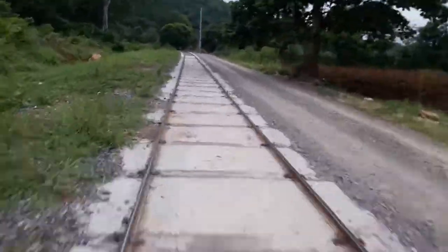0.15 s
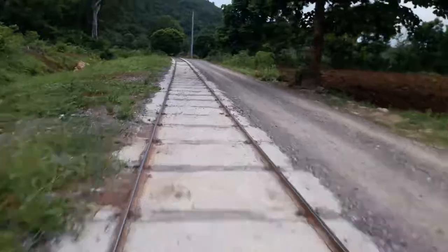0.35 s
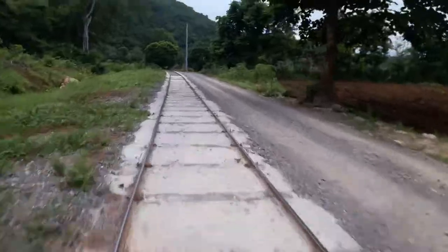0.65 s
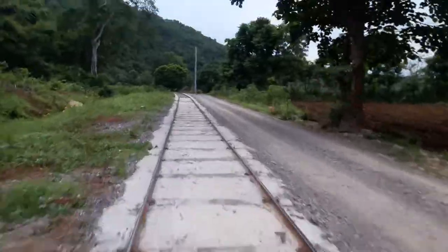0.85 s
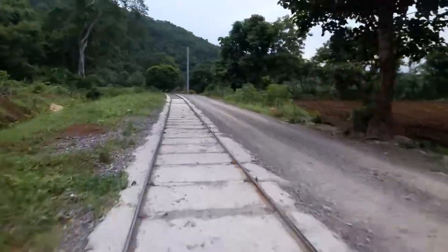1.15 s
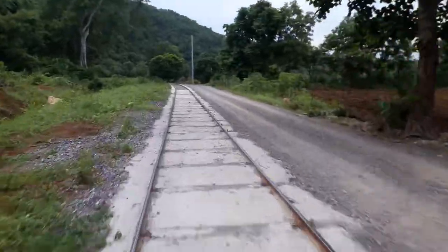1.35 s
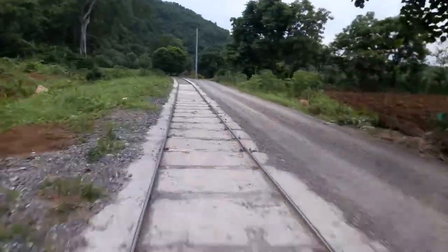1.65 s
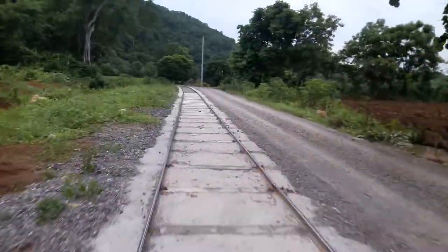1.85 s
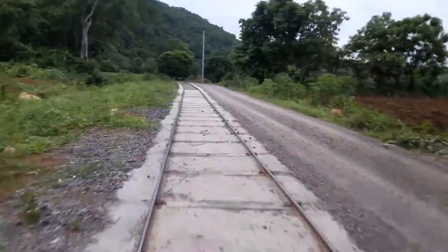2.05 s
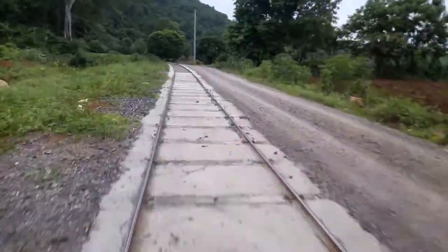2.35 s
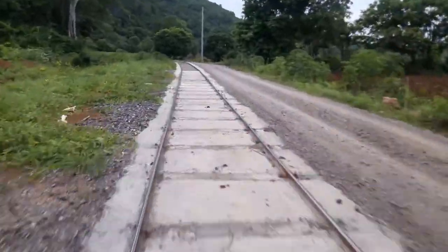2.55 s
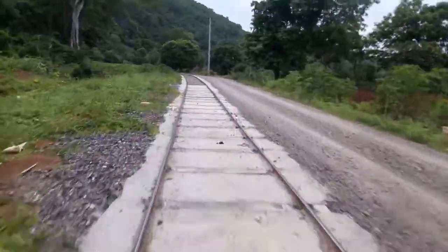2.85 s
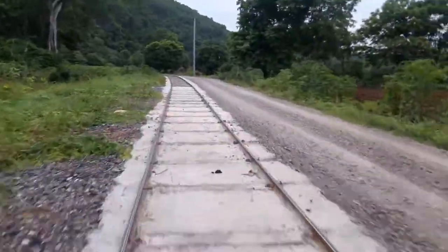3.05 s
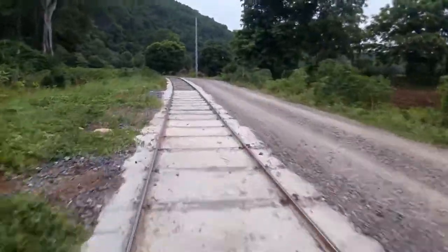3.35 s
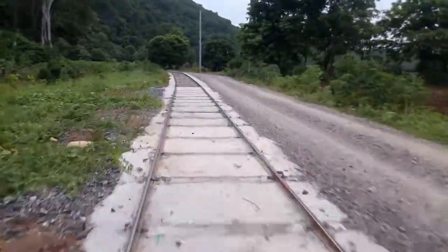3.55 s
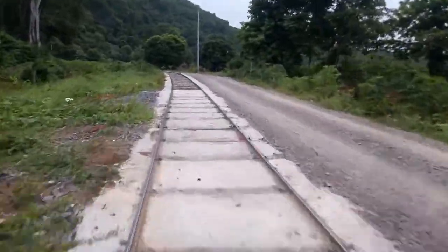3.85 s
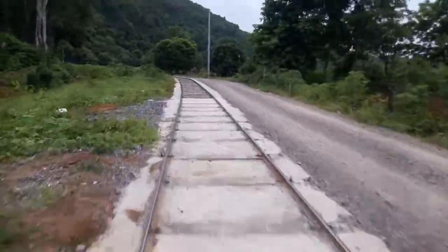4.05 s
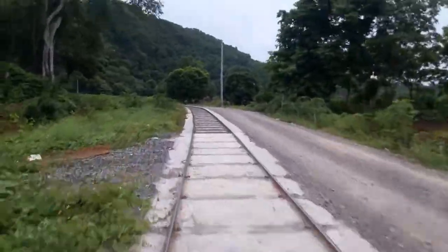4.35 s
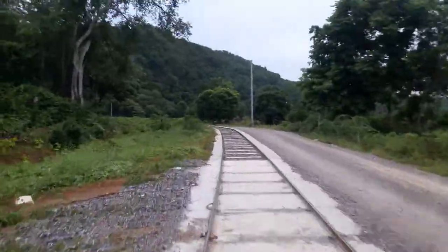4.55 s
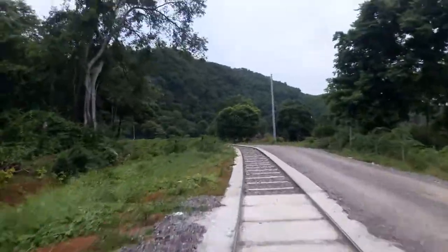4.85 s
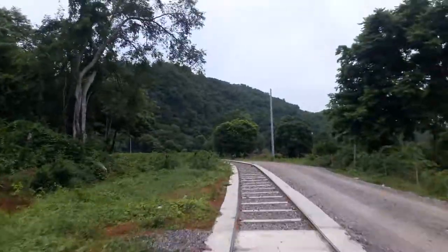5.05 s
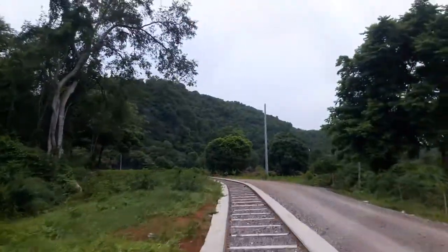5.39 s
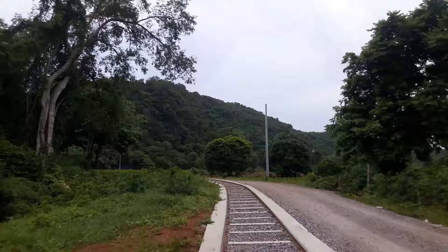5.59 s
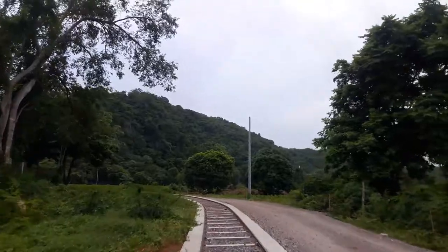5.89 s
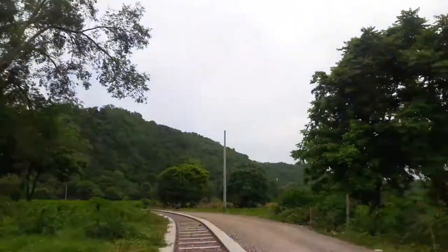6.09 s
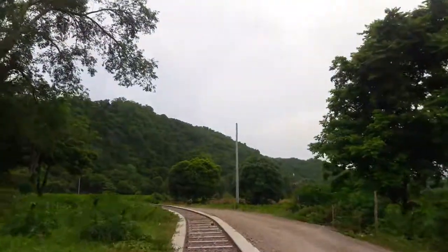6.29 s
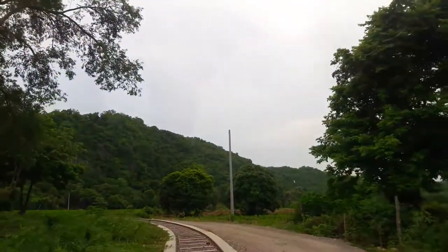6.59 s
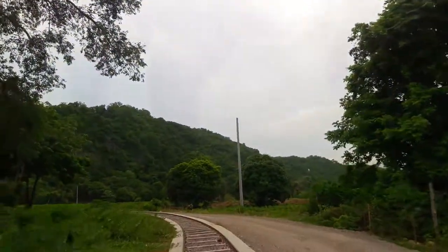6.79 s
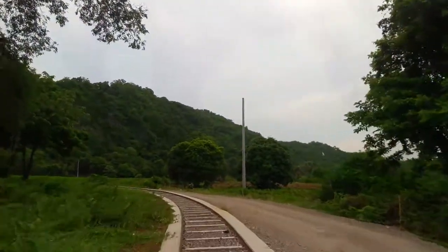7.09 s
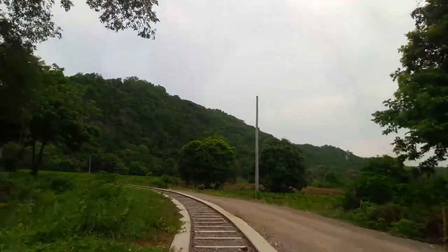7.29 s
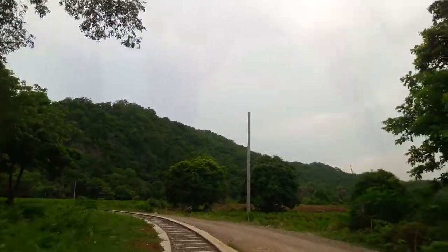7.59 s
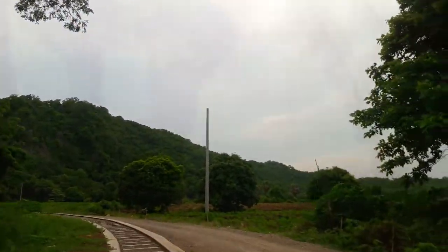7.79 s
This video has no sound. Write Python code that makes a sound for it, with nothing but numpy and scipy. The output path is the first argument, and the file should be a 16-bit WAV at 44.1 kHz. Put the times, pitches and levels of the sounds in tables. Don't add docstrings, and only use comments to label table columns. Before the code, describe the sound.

Low, dull rolling rumble of a rail cart with quick wheel thumps, metallic clacks and ticks, easing briefly, then booming harder over uneven rails.

```python
import sys
import numpy as np
from scipy import signal
from scipy.fft import rfft, irfft, next_fast_len
from scipy.io import wavfile
from scipy.ndimage import uniform_filter1d, minimum_filter1d, map_coordinates

SR = 44100
rng = np.random.default_rng(int(sys.argv[2]) if len(sys.argv) > 2 else 0)


def invert_db(level):
    return 10 ** (np.asarray(level, dtype=float) / 20)


def generate_wav(signal):
    frames = np.transpose(np.atleast_2d(signal))
    scaled = np.clip(frames, -1, 1) * 32767
    pcm = np.round(scaled).astype(np.int16)
    wavfile.write(sys.argv[1], SR, pcm)


N = 349713

# time in seconds, shake of the deck in dB,
# grind of wheel on rail in dB.
TRACK = [(0.0, -20.5, -42), (0.53, -24.5, -40), (0.77, -25.5, -40), (1.21, -21.5, -46),
         (1.54, -27.5, -46.5), (1.83, -24, -44), (2.12, -27, -47), (2.87, -27, -43.5), (3.22, -26.5, -45),
         (3.84, -25, -47), (4.77, -22.5, -40), (5.08, -20.5, -41), (5.72, -19, -45.5), (6.18, -17.5, -51),
         (6.49, -16, -44.5), (6.89, -18.5, -48), (7.57, -20, -49.5), (7.93, -19.5, -47)]
# time in seconds, level in dB, pitch in Hz.
HARD_LANDINGS = [(0.11, -18, 445), (0.35, -21, 355), (0.498, -20, 273), (0.75, -20.5, 298),
                 (0.984, -23.5, 454), (1.27, -23, 236), (1.648, -22, 485), (2.043, -24, 521.6),
                 (3.178, -22, 333), (3.31, -23.5, 498), (3.439, -19.5, 281), (3.445, -24, 499),
                 (3.57, -25, 355), (3.671, -20, 386), (3.803, -19.5, 474), (4.077, -25, 421),
                 (4.323, -19.5, 319), (4.724, -18, 427.6), (5.087, -17, 431), (5.472, -17.5, 443),
                 (5.73, -14, 218), (5.877, -18.5, 481), (6.525, -19.5, 464), (6.755, -17, 284),
                 (7.281, -13, 234.6), (7.568, -13, 246.3), (7.708, -15, 226), (7.819, -17.5, 322)]
# time in
# seconds, level in dB, pitch in Hz.
THUDS = [(0.227, -19.5, 178.6), (0.478, -40, 161.6), (0.772, -20.5, 139), (1.123, -24.5, 209),
         (1.317, -26, 100.3), (1.778, -25.5, 164.5), (1.958, -29.5, 153), (2.547, -23.5, 115.7),
         (2.927, -29, 118), (3.434, -19.5, 161.7), (3.747, -26.5, 147.7), (4.165, -25, 94.3),
         (4.334, -19, 140.8), (4.554, -27, 135), (4.997, -17, 182.4), (5.229, -9.5, 129.5),
         (5.458, -14.5, 130), (5.73, -26, 215.7), (5.892, -18, 222.3), (6.13, -21.5, 151),
         (6.442, -11.5, 207.8), (6.93, -14.5, 203.6), (7.057, -11.5, 154.7), (7.837, -20, 201),
         (6.285, -10, 185.2), (6.32, -9.5, 199), (6.392, -9.5, 140), (6.535, -7.5, 195),
            (6.603, -11.5, 137.6), (6.66, -8.5, 186), (6.75, -14.5, 122.6), (5.56, -25, 191.5),
            (7.4, -20, 193), (7.5, -19, 189.4)]
# time in seconds, peak in dB, ring in Hz, bright edge in dB.
CLACKS = [(0.4319, -31.5, 921, -35), (0.6655, -30, 902, -34.5), (0.7444, -17.5, 1780, -35),
          (0.8203, -29.5, 1720, -40.5), (0.9743, -20.5, 939, -29), (1.2303, -33, 926, -41),
          (1.53, -32.5, 1300, -33), (1.6427, -21.5, 1030, -42), (1.813, -30, 1660, -45.5),
          (2.09, -29.5, 1350, -42), (3.4236, -22.5, 1670, -38), (3.6582, -28.5, 1450, -44),
          (3.789, -32.5, 1500, -38), (3.833, -24, 1630, -39), (3.882, -27, 2700, -37),
          (4.06, -35, 914, -42), (4.3195, -19, 1026, -38.5), (4.4907, -26.5, 1060, -44.5),
          (4.6367, -26, 902, -40), (4.994, -27, 1280, -40.5), (5.2112, -19, 1546, -30.5),
          (5.452, -27, 993, -35.5), (6.19, -32.5, 1500, -28), (6.2736, -30.5, 902, -35.5),
          (6.392, -24, 988, -31), (6.64, -28, 1800, -28), (6.7503, -28, 1010, -31),
          (7.1095, -36, 1330, -38.5), (7.273, -36, 930, -37.5)]
# start in seconds, end in seconds, level in dB.
BUZZ_SPELLS = [
    (.55, 0.598, -66),
    (4.6, 5.25, -79),
    (6.27, 6.66, -61),
    (6.76, 6.8, -70),
    (7.9, 7.93, -68),
]
# time in seconds, peak in dB, pitch in Hz.
TICKS = [(0.4589, -24, 1750), (3.4944, -29, 1770), (3.7344, -37, 2700), (3.7653, -41, 2700),
         (3.8033, -34, 2750), (3.8244, -35, 1650), (3.8544, -40, 1520), (3.8851, -30, 2830),
         (3.9145, -29, 1890), (3.9594, -42, 1570), (4.3694, -34, 2300), (4.4732, -35, 1600),
         (4.5494, -28, 1540), (4.6444, -32, 1520), (4.7594, -27, 1980), (4.81, -36, 1900),
         (4.9444, -31, 1950), (6.1094, -37, 2270), (6.1894, -29.5, 1490), (6.3131, -27.5, 1750),
         (6.4494, -36, 1840), (6.5146, -33, 1855), (6.6398, -26, 1793)]
# time in seconds, peak in dB, pitch in Hz.
TOCKS = [
    (2.966, -23, 910),
    (4.144, -18.5, 880),
    (7.095, -20.5, 1030),
]
# time in seconds, peak in dB.
PINGS = [(0.096, -50), (0.2059, -51), (0.9792, -49), (1.697, -54), (1.8114, -52), (3.1792, -63),
         (3.2296, -52), (3.3553, -55), (3.7294, -56), (3.9564, -51), (4.1999, -59), (4.361, -49),
         (4.5511, -51.5), (4.628, -60), (5.214, -53.5), (5.2535, -47), (5.7519, -58), (5.9923, -64),
         (6.0861, -61), (6.1275, -52.5), (6.1853, -58), (6.2372, -57), (6.2786, -56), (6.3609, -46),
         (6.4158, -42), (6.4383, -49), (6.5415, -39), (6.578, -47), (6.6124, -49), (6.7386, -60)]
# time in seconds, peak in dB.
SPITS = [(0.472, -54.5), (0.5499, -53.5), (0.59, -41.5), (1.5211, -59), (1.5327, -57.5), (2.641, -65.5),
         (3.176, -71.5), (3.7886, -54.5), (3.9005, -73), (4.1846, -50.5), (4.2094, -57.5), (4.329, -60),
         (4.4166, -50), (4.4437, -58.5), (4.4609, -63.5), (4.9565, -64.5), (5.0544, -65.5), (5.09, -48.5),
         (5.2097, -68)]
# time in seconds, pitch in Hz, level in dB.
INSECTS = [
    [(.2, 7450, -110), (.35, 7420, -96.5), (.7, 7380, -90), (.9, 7350, -110)],
    [(4.2, 6750, -110), (4.3, 6750, -90), (4.5, 6650, -90), (4.9, 6450, -86), (5.25, 6350, -83.5),
     (5.35, 6350, -110)],
]
# peak in seconds, rise in seconds, fall in seconds,
# scrape in dB, fizz in dB.
GRASS = [
    (.6, .12, 0.082, -70.5, -59),
    (4.9, .5, .25, -81.5, -85.5),
    (6.54, .15, .2, -67, -90),
]
# centre in Hz, width in Hz, level in dB.
DECK = [(70, 22, -6.5), (99.7, 22, -2.5), (140.8, 34, 0), (195, 71, -3.5)]
FRAME = [(287, 164, 2.5), (355, 35, -2), (455.5, 37, -1), (503, 150, -8)]
RAIL = [(625, 380, 0.17), (860, 260, 0.19), (1010, 92, -2.2)]
WHEEL = [(1381, 160, 4), (1750, 280, 1), (2285, 340, -7), (2860, 280, -3)]
FITTING = [(10230, 220, -5.5), (11500, 350, -0.5)]
BUZZ = [(3636, 260, 0)]
# frequency in Hz, level in dB.
KNOCK = [(200, -41), (600, 3), (1200, -1.5), (2800, -6), (3400, -25), (4500, -46.5), (16000, -75.5)]
SCRAPE = [(2500, -29), (3300, 0.5), (3900, -2), (4400, -3), (5000, -7.5), (6500, -15.5), (7500, -34.5),
          (9000, -61), (16000, -63)]
FIZZ = [(3000, -60), (9000, -39), (11000, -23.5), (12200, -5), (14000, -2), (15200, -2.5), (16000, -3)]
HISS = [(2000, -13.5), (6000, -8), (7000, -9), (8000, -15.5), (9000, -8.5), (12000, -3), (15700, -1.5)]
HOUSING = [(15, -13), (28, -4.5), (45, 0), (2700, -1), (3100, -8), (3500, -16.5), (5000, -24), (8000, -56),
           (16000, -59.5)]

FLAT_S, TURN_S, SLIP_S, FLAT_DB, FLAT_SCATTER_DB = .11, .128, .01, -4.5, 1.9
FRAME_LOW_HZ, FRAME_HIGH_HZ = 238, 428.5
BUZZ_REST_DB, BUZZ_RISE_S, BUZZ_FALL_S = -78.5, .04, 0.023
JINGLE_S, JINGLE_GAP_S, JINGLE_DB, JINGLE_RISE_S, JINGLE_FALL_S = 6.375, 0.093, -71.5, .022, .016
SCRAPE_DB, SCRAPE_GROWS, FIZZ_DB = -80.5, .8, -84.5
CLACK_T60_S = .085
ROUGH_S, ROUGH_END_S, ROUGH_DB = 6.28, 6.69, 1.5


def unit(x):
    return x / np.sqrt(np.mean(x ** 2) + 1e-20)


def curves(rows):
    s, *cols = np.transpose(rows)
    return [np.interp(np.arange(N) / SR, s, c) for c in cols]


def controls():
    return [(c.mean(), c - c.mean()) for c in curves(TRACK)]


def wobble(rate):
    knots = rng.standard_normal(int(N * rate / SR) + 4)
    return map_coordinates(knots, [np.arange(N) * rate / SR])


def spell(start, end, rise_s, fall_s):
    t = np.arange(N) / SR
    return np.exp(-np.maximum(start - t, 0) / rise_s - np.maximum(t - end, 0) / fall_s)


def strike(t, t60_s, attack_s):
    return invert_db(-60 * t / t60_s) * (1 - np.exp(-t / attack_s))


def add(track, s, sound):
    part = track[max(round(s * SR), 0):][:len(sound)]
    part += sound[:len(part)]


def filtered(x, response):
    m = next_fast_len(len(x) + 8192)
    return irfft(rfft(x, m) * response(np.fft.rfftfreq(m, 1 / SR)), m)[:len(x)]


def colour(points):
    f, db = np.transpose(points)
    return lambda hz: invert_db(np.interp(np.log(hz + 1), np.log(f), db))


def modes(table, fall):
    def response(f):
        power = 0
        for centre, width, db in table:
            peak = np.abs(f * width / (centre * centre - f * f + 1j * f * width))
            power = power + invert_db(2 * db) * peak ** (2 * fall)
        return np.sqrt(power)
    return response


def rush(response, patchy_db, grit_db):
    rough = rng.standard_normal(N) * invert_db(grit_db * wobble(120))
    z = signal.stft(rough, nperseg=1024)[2]
    field = uniform_filter1d(rng.standard_normal(z.shape), size=5, axis=0)
    field = uniform_filter1d(field, size=6, axis=1)
    patchy = signal.istft(z * invert_db(patchy_db * unit(field)), nperseg=1024)[1][:N]
    return unit(filtered(patchy, response))


def swells(rows, length, spread, gain_db):
    out, t = np.zeros(N), np.arange(-SR // 12, SR // 12) / SR
    strikes = np.array(CLACKS)[:, 0]
    for (s, db, hz), luck in zip(rows, rng.standard_normal((len(rows), 10))):
        since = s - strikes
        lead = since[(since > .004) & (since < .03)]
        rise = 1.6 if len(lead) else .9
        shape = np.exp(-.5 * (t / (length * np.where(t < 0, rise, 1.3))) ** 2)
        if len(lead):
            shape *= 1 - np.exp(-np.maximum(t + lead[0], 0) / .003)
        near = hz * np.exp(spread * luck[:5, None])
        near = 535 - np.abs(535 - near)
        neighbours = np.sin(2 * np.pi * near * t + 3 * luck[5:, None]).sum(axis=0)
        ring = 1.15 * np.sin(2 * np.pi * hz * t) + 0.76 * neighbours
        add(out, s - 1 / 12, invert_db(db + gain_db) * shape * unit(ring))
    return out


def rolling():
    (low_db, boom_db), (high_db, grind_db) = controls()
    boom_db = boom_db + ROUGH_DB * spell(ROUGH_S, ROUGH_END_S, rise_s=.015, fall_s=.06)
    deck_db = low_db - 1.0 + 0.96 * boom_db
    frame_db = low_db - 4.83 + 1.09 * boom_db
    rail_db = high_db + 6.0 + 0.21 * boom_db + 0.78 * grind_db
    wheel_db = high_db - 2.23 + 0.81 * grind_db
    shake = wobble(12)

    def deck_tone(f):
        return modes(DECK, fall=1.15)(f) / (1 + (f / 600) ** 2)

    def frame_tone(f):
        return modes(FRAME, fall=1.5)(f) / (1 + (f / 900) ** 2)

    deck = invert_db(deck_db + 0.39 * shake) * rush(deck_tone, patchy_db=0.0, grit_db=0.46)
    frame = invert_db(frame_db + 1.2 * shake) * rush(frame_tone, patchy_db=0.57, grit_db=1.05)
    rail = invert_db(rail_db + 1.2 * shake) * rush(modes(RAIL, fall=1.15), patchy_db=2.0, grit_db=1.5)
    wheel = invert_db(wheel_db + 0.47 * shake) * rush(modes(WHEEL, fall=1.0), patchy_db=3.0, grit_db=1.2)
    return deck + frame + rail + wheel


def ticks():
    grind_db = curves(TRACK)[1]
    out, t = np.zeros(N), np.arange(SR // 25) / SR
    fade = strike(t, t60_s=0.038, attack_s=0.0015)
    for when, which, detune, size in rng.random((700, 4)):
        hz = WHEEL[int(which * len(WHEEL))][0] * (1 + .35 * (detune - .5))
        level = invert_db(grind_db[int(when * N)] + 2.5 + 10.7 * size) * 1400 / hz
        add(out, when * N / SR, level * fade * np.sin(2 * np.pi * hz * t))
    for s, db, hz in TICKS + TOCKS:
        add(out, s, invert_db(db - 2.3) * fade * np.sin(2 * np.pi * hz * t))
    return out


def rattle():
    chatter = wobble(45)
    shaken = invert_db(BUZZ_REST_DB)
    for start, end, db in BUZZ_SPELLS:
        shaken = shaken + invert_db(db) * spell(start, end, BUZZ_RISE_S, BUZZ_FALL_S)
    buzz = shaken * invert_db(1.0 + .8 * chatter) * rush(modes(BUZZ, fall=1.8), patchy_db=-0.8, grit_db=3.0)

    pings, t = np.zeros(N), np.arange(SR // 8) / SR
    ping = strike(t, t60_s=.065, attack_s=.004) * np.sin(2 * np.pi * BUZZ[0][0] * t)
    for s, db in PINGS:
        add(pings, s, invert_db(db + 1) * ping)

    burst_times = JINGLE_S + JINGLE_GAP_S * np.arange(4)
    bursts = sum(spell(s, s, JINGLE_RISE_S, JINGLE_FALL_S) for s in burst_times)
    chime = rush(modes(FITTING, fall=2.2), patchy_db=-2.0, grit_db=3.0)
    jingle = bursts * invert_db(JINGLE_DB + 2.4 * chatter) * chime
    return buzz + pings + jingle


def grit():
    grind_db = controls()[1][1]
    scrape_gain = invert_db(SCRAPE_DB + SCRAPE_GROWS * grind_db)
    fizz_gain = np.full(N, invert_db(FIZZ_DB))
    for s, rise, fall, scrape_db, fizz_db in GRASS:
        brush = spell(s, s, rise, fall)
        scrape_gain += invert_db(scrape_db) * brush
        fizz_gain += invert_db(fizz_db) * brush
    t = np.arange(SR // 10) / SR
    for s, db in SPITS:
        add(fizz_gain, s, invert_db(db - 10) * strike(t, t60_s=.06, attack_s=.003))
    fizz = fizz_gain * rush(colour(FIZZ), patchy_db=3.5, grit_db=1.0)
    scrape = scrape_gain * rush(colour(SCRAPE), patchy_db=3.0, grit_db=3.5)
    return fizz + invert_db(4 + 1.1 * wobble(22)) * scrape


def flats():
    shake_db, hard = curves(TRACK)[0], np.array(HARD_LANDINGS)[:, 0]
    strikes = []
    for s in np.arange(FLAT_S, 7.85, TURN_S):
        slip, size = rng.standard_normal(2)
        hz = FRAME_LOW_HZ + (FRAME_HIGH_HZ - FRAME_LOW_HZ) * rng.random()
        if np.abs(hard - s).min() > TURN_S / 2:
            db = shake_db[int(s * SR)] + FLAT_DB + FLAT_SCATTER_DB * size
            strikes.append((s + SLIP_S * slip, db, hz))
    return swells(HARD_LANDINGS + strikes, length=0.013, spread=.31, gain_db=-0.5)


def insects():
    out = np.zeros(N)
    for song in INSECTS:
        hz, db = curves(song)
        phase = 2 * np.pi * np.cumsum(hz + 110 * wobble(300)) / SR
        out += invert_db(db + 6.5 * wobble(30)) * np.sin(phase)
    return out


def thuds():
    return swells(THUDS, length=.021, spread=.2, gain_db=-2.0)


def clacks():
    out, t = np.zeros(N), np.arange(SR // 5) / SR
    fade = strike(t, CLACK_T60_S, attack_s=0.0013)
    for s, db, ring_hz, edge_db in CLACKS:
        knock = unit(filtered(rng.standard_normal(len(t)), colour(KNOCK)))
        edge = unit(filtered(rng.standard_normal(len(t)), colour(SCRAPE)))
        ring = 0.44 * np.sin(2 * np.pi * ring_hz * t)
        add(out, s, invert_db(db - 7) * fade * (knock + ring + invert_db(edge_db + 3) * edge))
    return out


def scene():
    body = filtered(rolling() + ticks() + flats() + thuds(), colour(HOUSING))
    return (body + rattle() + grit() + insects() + clacks())[None]


def top_cut(x):
    return signal.sosfilt(signal.butter(12, 15730, fs=SR, output="sos"), x)


def record(dry):
    need = np.minimum(1, .74 / np.maximum(np.abs(dry), 1e-6))
    held = minimum_filter1d(need, size=901)
    gain = uniform_filter1d(uniform_filter1d(held, size=441), size=441)
    hiss = invert_db(-79) * rush(colour(HISS), patchy_db=-0.5, grit_db=0.5)
    return top_cut(dry * gain + hiss)


dry = scene()
out = record(dry)
generate_wav(out)
```